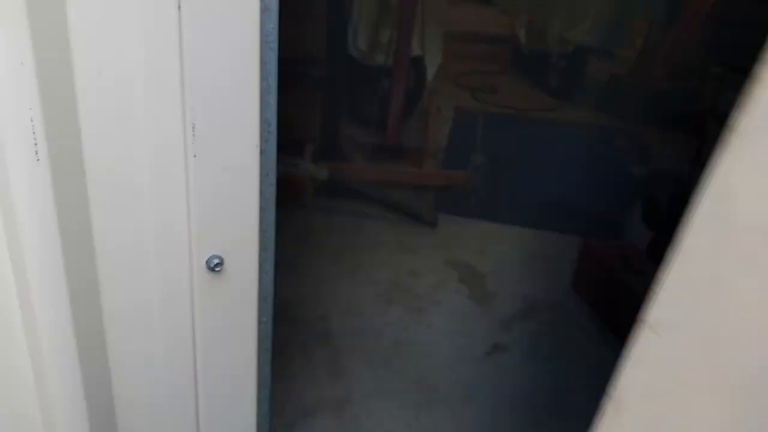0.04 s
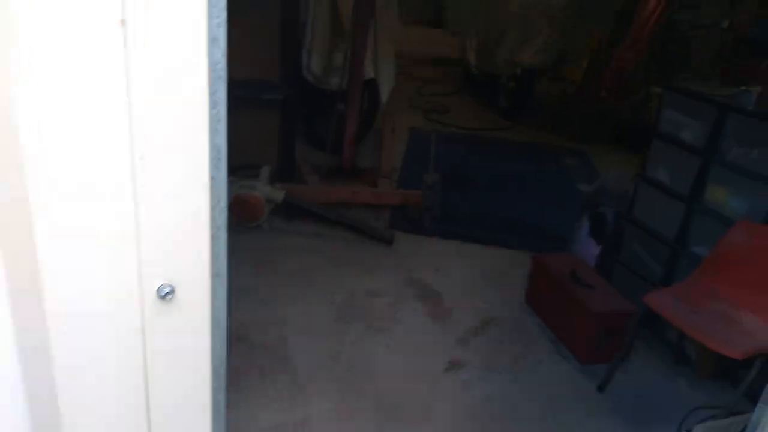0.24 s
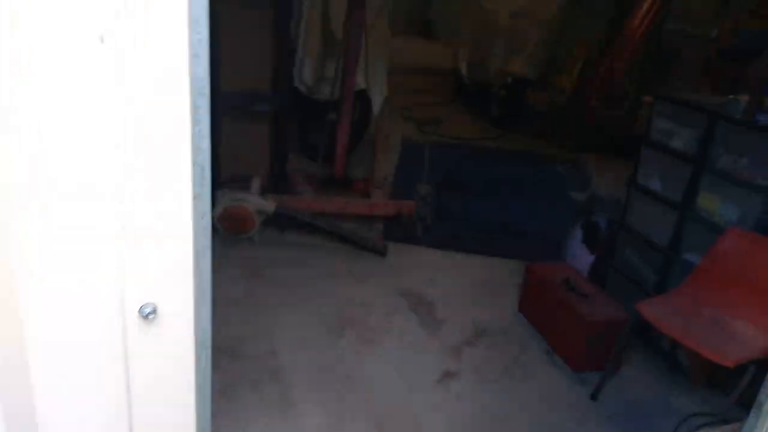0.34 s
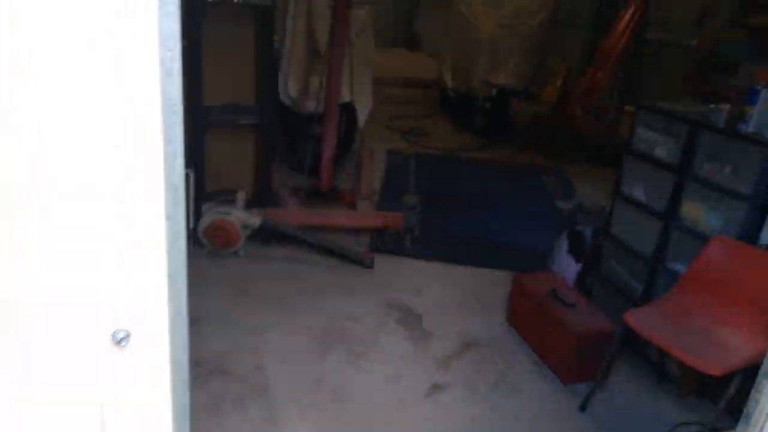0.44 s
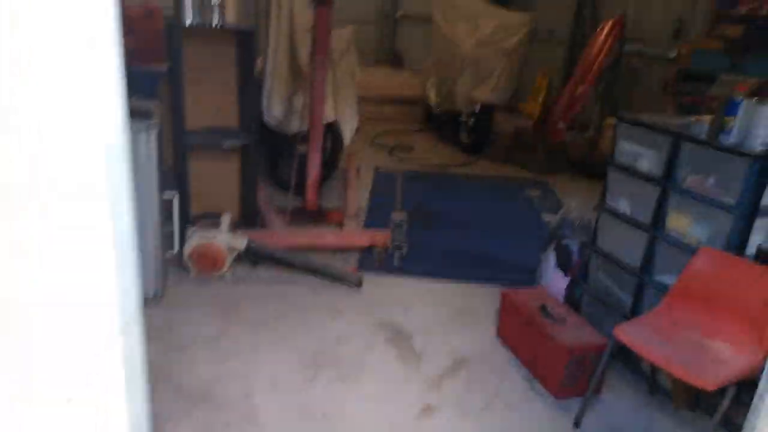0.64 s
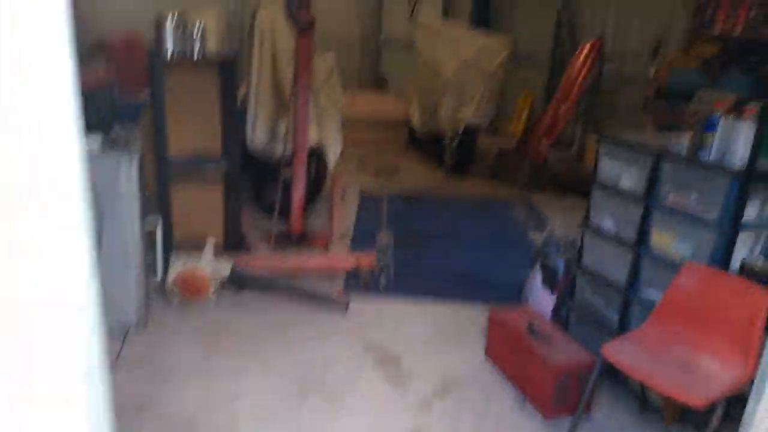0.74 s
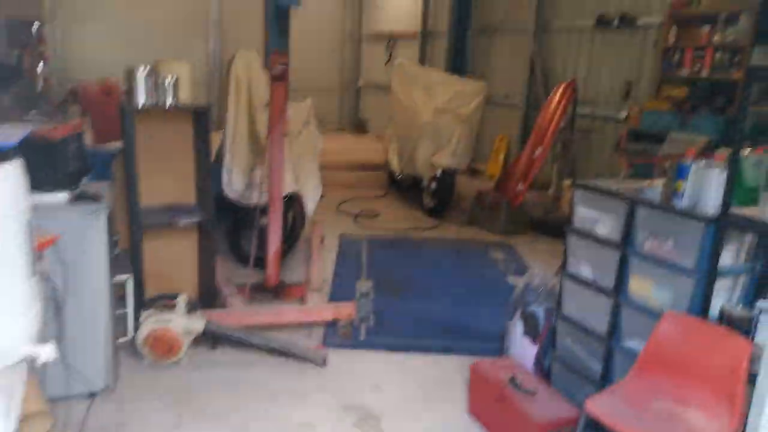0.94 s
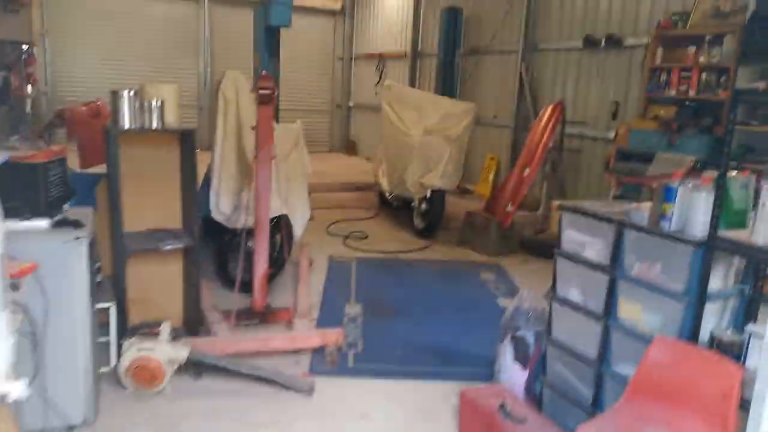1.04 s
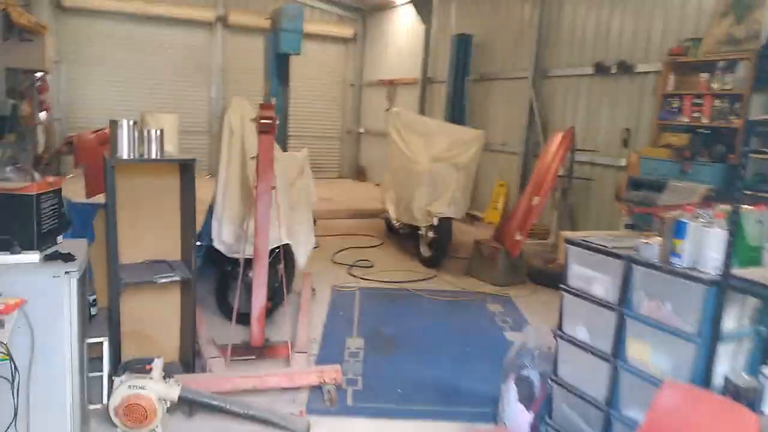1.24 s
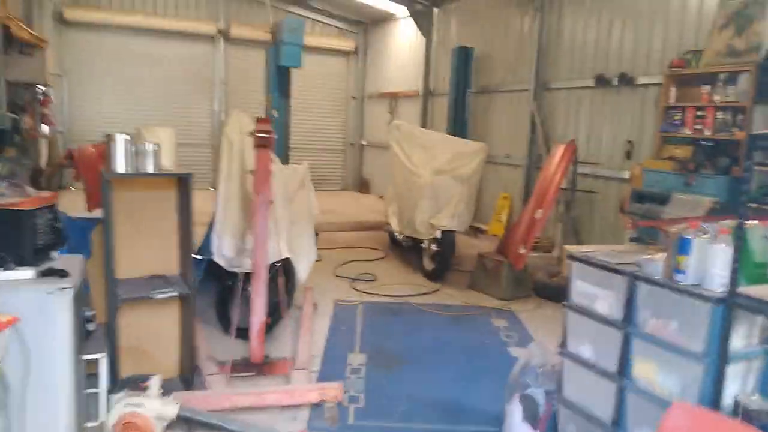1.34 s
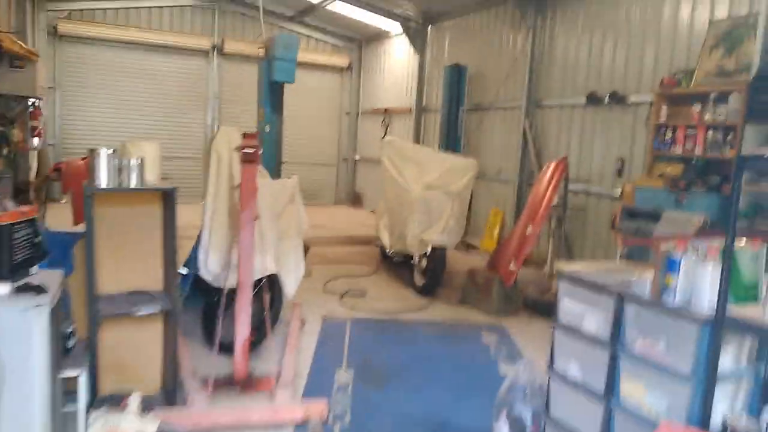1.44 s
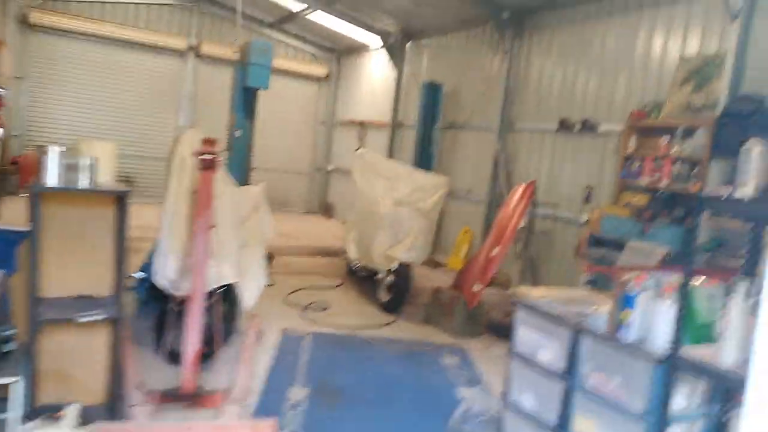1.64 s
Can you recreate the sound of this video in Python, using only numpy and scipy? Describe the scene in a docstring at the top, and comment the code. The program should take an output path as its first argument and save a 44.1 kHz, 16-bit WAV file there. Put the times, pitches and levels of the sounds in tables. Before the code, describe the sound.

A steel-clad shed door scrapes open on gritty concrete. Faint crackles and sharp catches, leaning left, grow from 0 to 0.3 seconds. A loud, bright, juddering hiss runs from 0.3 to 1.2, surging near 0.5 and 0.85, drifting right, with rasping sheet metal, brief squeals, low rumble and dull bumps. It dulls, stops around 1.4 with a soft knock, leaving faint air and a short shed tail.

```python
"""Gritty hiss and crackle as a steel-clad shed door catches, then drags over concrete on its bottom edge.
Dense clicks make the grit; the same kind of clicks, filtered lower, make the cladding and frame rasp
and the leaf rumble, and ring short resonances for the squeals. Damped sine notes are soft bumps of door and feet.
Steel walls add a short tail to the scraping, over faint air, on a small, bright stereo microphone."""
import sys
import numpy as np
from scipy import signal
from scipy.fft import rfft, irfft, next_fast_len
from scipy.io import wavfile

SR = 44100
rng = np.random.default_rng(int(sys.argv[2]) if len(sys.argv) > 2 else 0)


def file_out(sig):
    """Save sig as 16-bit WAV at sys.argv[1]."""
    # one column per channel
    cols = np.atleast_2d(sig).T
    # limit, then scale
    lim = np.clip(cols, -1, 1)
    pcm = np.round(lim * 32767).astype(np.int16)
    wavfile.write(sys.argv[1], SR, pcm)


N = 72765
T = np.arange(N) / SR  # time, s


def from_db(db):
    """Decibels to gain."""
    return 10 ** (np.asarray(db) / 20)


def rms_one(x):
    """Scale to unit rms."""
    return x / np.sqrt(np.mean(x ** 2) + 1e-20)


def in_time(rows):
    """Join (t/s, value) rows by straight lines."""
    return np.interp(T, *np.transpose(rows))


def pan(left_right_db):
    """Left and right gains of constant power; positive dB leans left."""
    return rms_one(from_db(np.array([[.5], [-.5]]) * left_right_db))


def drift(hz):
    """Random wander of unit rms: noise through two equal low-pass poles."""
    r = np.exp(-2 * np.pi * hz / SR)
    wander = signal.lfilter([1], [1, -2 * r, r * r], rng.standard_normal(2 * N))
    return rms_one(wander[N:])  # the first half lets the filter settle


def colour(x, spectrum):
    """Causal minimum-phase filter shaped by (f/Hz, level/dB) rows; output of unit rms."""
    size = 2 * next_fast_len(N)
    hz, db = np.transpose(spectrum)
    bins = np.maximum(np.fft.rfftfreq(size, 1 / SR), 1)
    octaves_outside = np.abs(np.log2(bins / np.clip(bins, hz[0], hz[-1])))
    curve_db = np.interp(np.log(bins), np.log(hz), db)
    curve_db = curve_db - 24 * np.minimum(octaves_outside, 2)  # 24 dB per octave beyond the table
    # Folding the cepstrum onto positive time gives minimum phase
    cepstrum = irfft(np.log(from_db(curve_db)))
    cepstrum[size // 2:] = 0
    response = np.exp(2 * rfft(cepstrum))
    return rms_one(irfft(rfft(x, size) * response)[..., :N])


ALIKE_BASS, ALIKE_BELOW_HZ = 0.85, 1610  # shared power of the bass; gentle split frequency
LEFT_LAG_S = 0.0004004


def stereo(three):
    """Mostly shared bass, its common part late on the left, plus unrelated treble at each port."""
    low = signal.lfilter(*signal.butter(1, ALIKE_BELOW_HZ, "low", fs=SR), three)
    high = signal.lfilter(*signal.butter(1, ALIKE_BELOW_HZ, "high", fs=SR), three)
    late_left = np.interp(T - LEFT_LAG_S, T, low[0])
    shared = np.array([late_left, low[0]])
    return np.sqrt(ALIKE_BASS) * shared + np.sqrt(1 - ALIKE_BASS) * low[1:] + high[1:]


GRAINS_PER_S, GRAIN_SPREAD_DB = 9000, 1  # in each of three streams


def grains():
    """Dense clicks of cracking grit: random times and signs, mostly small, a few larger."""
    size_db = GRAIN_SPREAD_DB * np.minimum(rng.exponential(1, (3, N)), 5)
    clicks = from_db(size_db) * rng.choice([-1, 1], (3, N))
    cracking = rng.random((3, N)) < GRAINS_PER_S / SR
    return rms_one(stereo(clicks * cracking))


JUDDER_HZ, JUDDER_DB, CHATTER_HZ, CHATTER_DB = 23.1, 1.0, 246, -0.2


def stick_slip():
    """Uneven rubbing: a slow judder and a fine chatter wander the scraping level."""
    return rms_one(from_db(JUDDER_DB * drift(JUDDER_HZ) + CHATTER_DB * drift(CHATTER_HZ)))


# Grit crushed under the edge, before trim: [t/s, level/dB]
GRIT_LEVEL = [(0, -36.5), (.05, -38), (.075, -28), (.095, -32.5), (.12, -24), (.15, -30), (.19, -25.5),
              (.28, -20), (.34, -17.5), (.41, -19.5), (.48, -14), (.55, -14.5), (.61, -19.5), (.7, -17.5),
              (.77, -17), (.86, -14.5), (.91, -18), (1.0, -18), (1.14, -19.5), (1.19, -20.5), (1.3, -23.5),
              (1.395, -25), (1.43, -41), (1.5, -45), (1.55, -52.5), (1.65, -52.5)]
# Where the edge is heard as the door swings past: [t/s, left-right level/dB]
GRIT_PAN = [(0, 1.3), (.17, 2.5), (.24, 2.5), (.34, 0), (.65, .3), (.95, -1.8), (1.25, -1.7), (1.41, -2.5),
            (1.52, -2)]
# Edge catches and slips, before trims: [t/s, level/dB, attack/s, decay/s, left-right level/dB]
EDGE_CATCHES = [(0.054, -24.5, 0.0015, 0.018, 3), (0.103, -17.5, .001, 0.0034, 8),
                (0.154, -16.5, 0.009, 0.024, 6.5), (0.205, -13.5, 0.01, 0.0079, 8),
                (0.25, -15.5, 0.0018, .007, 2), (.297, -9.5, 0.011, 0.0061, -1),
                (0.319, -12, 0.0013, .006, 2), (.435, -15, 0.0034, .015, 2),
                (0.529, -11.5, 0.014, 0.017, -1), (0.697, -26, .002, 0.0031, -2),
                (0.789, -12, 0.017, 0.017, -4), (.928, -15, 0.0035, 0.0079, -3),
                (.953, -14, .002, .006, -2), (1.046, -9.5, 0.005, 0.006, -4),
                (1.123, -16, 0.0028, 0.0078, -4), (1.395, -22, 0.0016, 0.0056, -5),
                (1.464, -34, 0.0022, 0.013, -3)]
# Relative tone of the crackle: [f/Hz, level/dB]
GRIT_COLOUR = [(3500, -50.5), (4700, -8.5), (5400, -6), (6200, -2.5), (6700, 0), (7500, -1), (8500, 1.5),
               (10000, 0), (13000, -1.5), (16000, -5.5)]
# The crackle loses its top as the door slows: [t/s, muffled share/0-1]
GRIT_DULLING = [(1.1, 0), (1.22, 0), (1.42, 0.57)]
GRIT_DB, CATCH_DB, DULL_HZ = -5.5, -1, 9400  # overall trim, extra catch trim, muffling cutoff


def grit(slip):
    """Bright crackle under the edge, with a surge at each catch, duller as the door slows."""
    power = (from_db(in_time(GRIT_LEVEL)) * pan(in_time(GRIT_PAN))) ** 2
    for start, db, attack, decay, side_db in EDGE_CATCHES:
        rise = np.clip((T - start) / attack, 0, 1)
        surge = rise * np.exp(-np.maximum(T - start - attack, 0) / decay)
        power = power + (from_db(db + CATCH_DB) * surge * pan(side_db)) ** 2
    bright = colour(grains(), GRIT_COLOUR)
    low_pass = signal.butter(2, DULL_HZ, fs=SR, output="sos")
    dull = rms_one(signal.sosfiltfilt(low_pass, bright))
    share = in_time(GRIT_DULLING)
    crackle = (1 - share) * bright + share * dull
    return from_db(GRIT_DB) * np.sqrt(power) * slip * crackle


# How hard the edge shakes the cladding, before trim: [t/s, level/dB]
SHEET_LEVEL = [(0, -43.5), (.09, -41.5), (.11, -36.5), (.2, -33.5), (.295, -28.5), (.315, -27),
               (.37, -30.5), (.46, -27), (.55, -26), (.63, -29.5), (.77, -29.5), (.87, -26), (.93, -28.5),
               (1.12, -29.5), (1.27, -31.5), (1.335, -39), (1.36, -44.5), (1.46, -53), (1.65, -58)]
# Relative tone of the steel sheet: [f/Hz, level/dB]
SHEET_COLOUR = [(500, -20.5), (720, -8), (950, -3), (1200, -2), (1520, 1), (1830, 0), (2040, -0.5),
                (2300, -3.5), (2900, -3.5), (3600, -1), (4500, -1.5), (5000, -8.5), (5700, -8.5)]
# Where the cladding is heard: [t/s, left-right level/dB]
SHEET_SIDE = [(0, 2.5), (.28, 6), (.45, 5), (.6, 3.5), (.8, 3), (1.3, 3), (1.45, 2.5)]
# The frame's low rasp, before trim: [t/s, level/dB]
FRAME_LEVEL = [(0, -69), (.14, -83), (.23, -55.5), (.28, -49.5), (.55, -49), (.6, -43), (.8, -44.5),
               (.87, -38.5), (.93, -42.5), (1.06, -41), (1.25, -48), (1.33, -48), (1.36, -56), (1.43, -56),
               (1.52, -67)]
# Relative tone of the frame: [f/Hz, level/dB]
FRAME_COLOUR = [(170, -5.5), (240, -8.5), (320, 0.5), (365, -1.5), (420, -1), (520, 0), (700, 2.5),
                (820, -4), (1050, -11.5)]
SHEET_DB, FRAME_DB, FRAME_PAN_DB = 2.5, 4, -1  # trims; the frame lies to the right of the sheet


def cladding(slip):
    """The scraping rasps in the steel sheet and, lower, in the frame: filtered grain clicks."""
    sheet = from_db(SHEET_DB + in_time(SHEET_LEVEL)) * colour(grains(), SHEET_COLOUR)
    frame = from_db(FRAME_DB + in_time(FRAME_LEVEL)) * colour(grains(), FRAME_COLOUR)
    side_db = in_time(SHEET_SIDE)
    return slip * (sheet * pan(side_db) + frame * pan(side_db + FRAME_PAN_DB))


# Resonances the edge briefly sets singing; width is that of each of two stages:
# [t/s, length/s, f/Hz, width/Hz, level/dB before swell and pan]
EDGE_SQUEALS = [(0.232, 0.095, 312, 45, -50), (0.445, .12, 1560, 300, -33), (0.571, .32, 315, 54, -43.5),
                (0.79, 0.052, 6850, 1300, -23.5), (1.025, 0.088, 718, 132, -36.5),
                (1.179, 0.069, 1997, 200, -29.5), (1.215, 0.14, 2090, 450, -40.5),
                (1.207, 0.12, 362, 90, -43.5), (1.361, 0.043, 660, 160, -45),
                (1.346, 0.16, 229, 121, -51.5), (1.41, .11, 9160, 400, -57)]


def squeals():
    """Single resonances, excited by grain clicks, swell and fade under the rubbing."""
    out = 0
    for start, length, hz, width_hz, db in EDGE_SQUEALS:
        r = np.exp(-np.pi * width_hz / SR)
        resonance = [1, 0, -1, 1, -2 * r * np.cos(2 * np.pi * hz / SR), r * r]
        tone = rms_one(signal.sosfilt([resonance, resonance], grains()))
        progress = np.clip((T - start) / length, 0, 1)
        swell = np.sqrt(np.abs(np.sin(np.pi * progress)))
        out = out + from_db(db) * tone * swell
    return out * pan(2.5)


# Rumble of the moving leaf, before trim: [t/s, level/dB]
RUMBLE_LEVEL = [(0, -72), (.16, -73), (.28, -63), (.36, -50), (.47, -41.5), (.55, -46.5), (.64, -44),
                (.8, -48), (.87, -47), (.91, -56), (1.01, -49.5), (1.1, -44), (1.22, -40), (1.28, -50),
                (1.48, -56), (1.58, -63)]
# Relative tone of the rumble: [f/Hz, level/dB]
RUMBLE_COLOUR = [(25, -40), (45, -3), (70, -2.5), (90, -5), (125, -0.5), (170, -8), (240, -28), (400, -37)]
RUMBLE_DB = 1.5


def leaf_rumble():
    """The whole leaf booms as it moves: grain clicks filtered to the low bass."""
    return from_db(RUMBLE_DB + in_time(RUMBLE_LEVEL)) * colour(grains(), RUMBLE_COLOUR)


# Dull bumps of door and feet: [t/s, level/dB before attack, decay and pan, f/Hz, t60/s, left-right level/dB]
SOFT_BUMPS = [(0.344, -33.5, 51, 0.56, -9), (0.386, -30.5, 51.4, 0.55, -18), (0.462, -33, 92, 0.14, 6),
              (0.584, -26.5, 106, 0.12, -2), (0.599, -31.5, 52, 0.23, -6), (.925, -28.5, 75, 0.07, -6),
              (1.052, -31.5, 117, 0.18, -2), (1.145, -46, 55, .2, -7), (1.188, -27.5, 95, 0.14, -7),
              (1.401, -26, 125, 0.047, 5), (1.47, -39.5, 52.6, 0.19, -9), (1.632, -47, 110, 0.066, -2)]
BUMP_ATTACK_CYCLES = 0.75


def bumps():
    """Each bump rings one low, exponentially damped sine after a soft attack."""
    out = 0
    for start, db, hz, t60, side_db in SOFT_BUMPS:
        age = np.maximum(T - start, 0)
        attack = np.minimum(age * hz / BUMP_ATTACK_CYCLES, 1)
        note = attack * np.sin(2 * np.pi * hz * age)
        out = out + from_db(db - 60 * age / t60) * note * pan(side_db)
    return out


SHED_T60_S, SHED_DB = 0.22, -11


def shed(x):
    """Add the steel walls' dense, short reflections as decaying noise, unrelated left and right."""
    tail = rng.standard_normal((2, N)) * from_db(-60 * T / SHED_T60_S) * (T > .003)
    tail /= np.sqrt(np.sum(tail ** 2, axis=1, keepdims=True))  # unit energy
    return x + from_db(SHED_DB) * signal.fftconvolve(x, tail, axes=1)[:, :N]


# Relative tone of the background air: [f/Hz, level/dB]
AIR_COLOUR = [(25, -20), (50, -2), (160, 3.5), (300, 0), (700, -6), (1400, -8), (3000, -20), (6000, -17),
              (16000, 0)]
AIR_DB = -56


def air():
    """Faint steady air: coloured stereo noise."""
    return from_db(AIR_DB) * colour(stereo(rng.standard_normal((3, N))), AIR_COLOUR)


def scene():
    """Scraping rings in the shed; the rumble, bumps and air stay dry."""
    slip = stick_slip()
    scraping = grit(slip) + cladding(slip) + squeals()
    return shed(scraping) + leaf_rumble() + bumps() + air()


PORT_HZ, PORT_WIDTH_HZ, PORT_DB = (8390, 9100), 1450, 12  # left and right port resonances
CUTOFF_HZ = 16000


def record(dry):
    """Each microphone port rings in the high treble; peaks are rounded and the top is cut."""
    r = np.exp(-np.pi * PORT_WIDTH_HZ / SR)
    ports = []
    for hz, side in zip(PORT_HZ, dry):
        poles = [1, -2 * r * np.cos(2 * np.pi * hz / SR), r * r]
        ports.append(signal.lfilter([1, 0, -1], poles, side))
    unit_peak = (1 - r * r) / 2  # brings each resonance to unit gain
    bright = dry + (from_db(PORT_DB) - 1) * unit_peak * np.array(ports)
    rounded = 1.1 * np.tanh(bright / 1.1)
    low_pass = signal.ellip(12, .1, 80, CUTOFF_HZ, fs=SR, output="sos")
    return signal.sosfilt(low_pass, rounded)


dry = scene()
out = record(dry)
file_out(out)
```